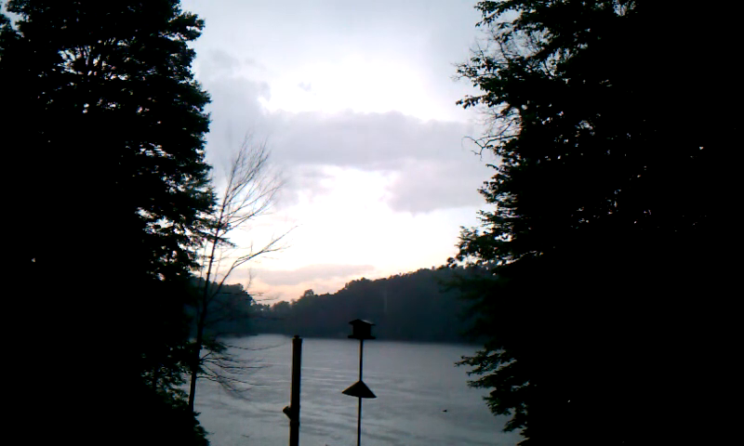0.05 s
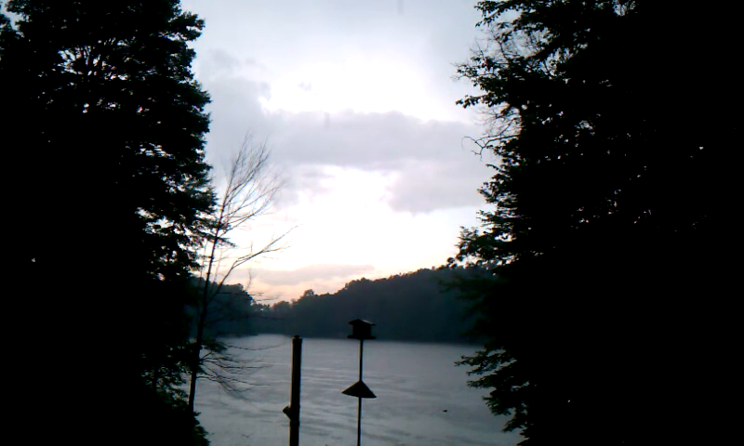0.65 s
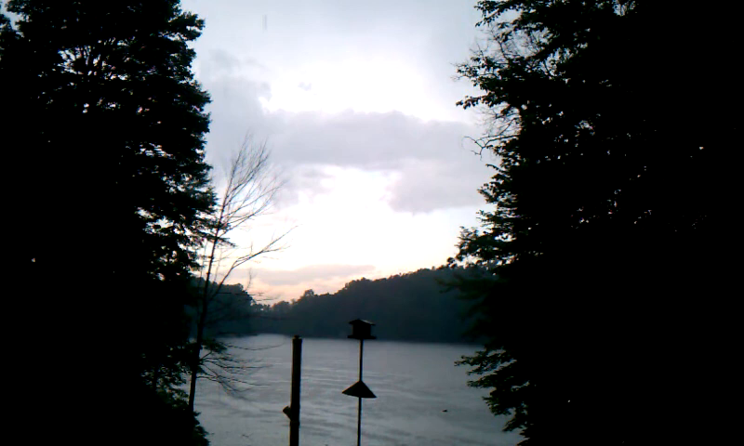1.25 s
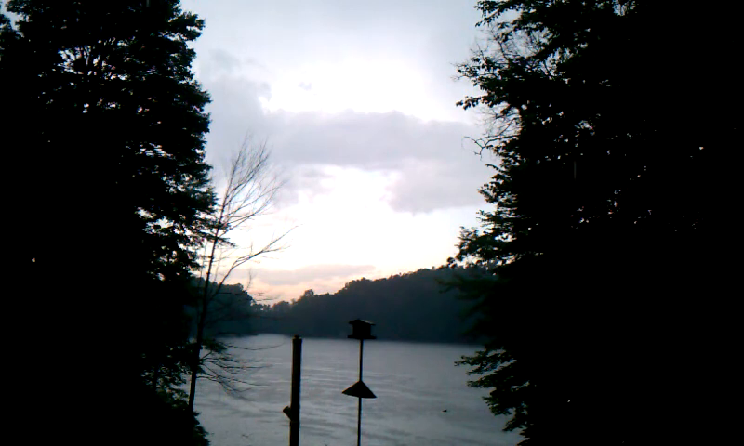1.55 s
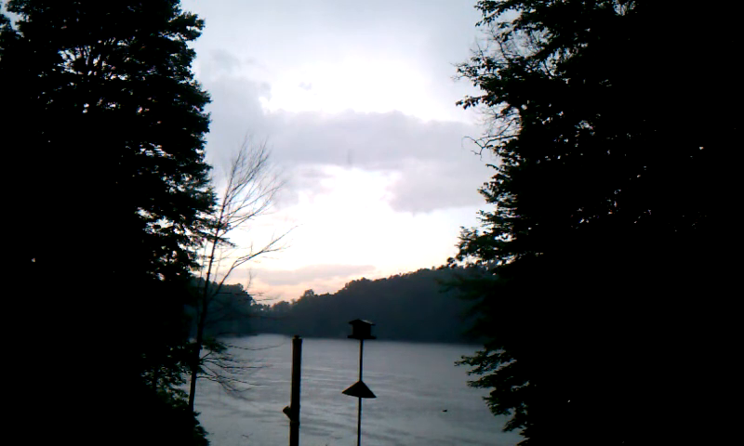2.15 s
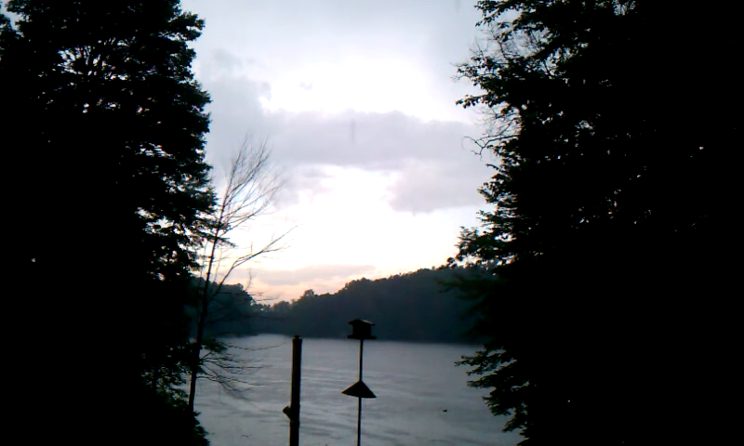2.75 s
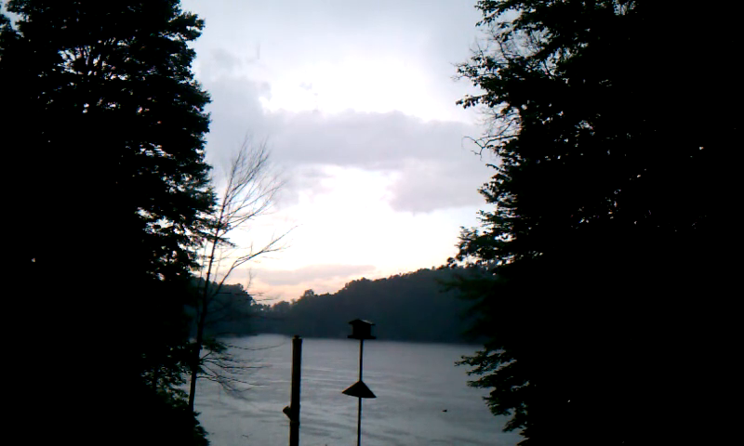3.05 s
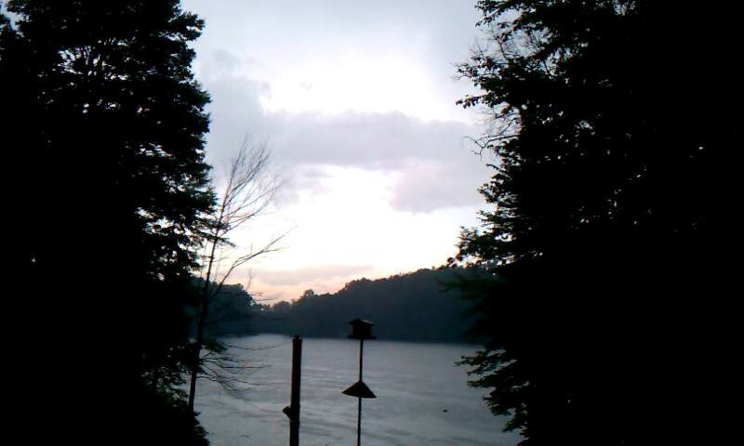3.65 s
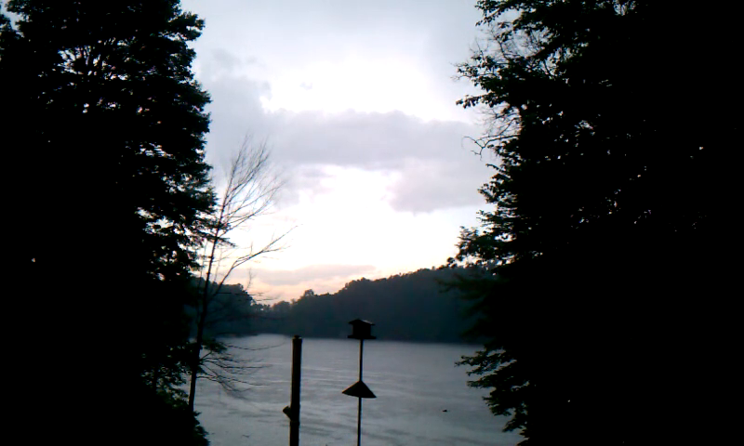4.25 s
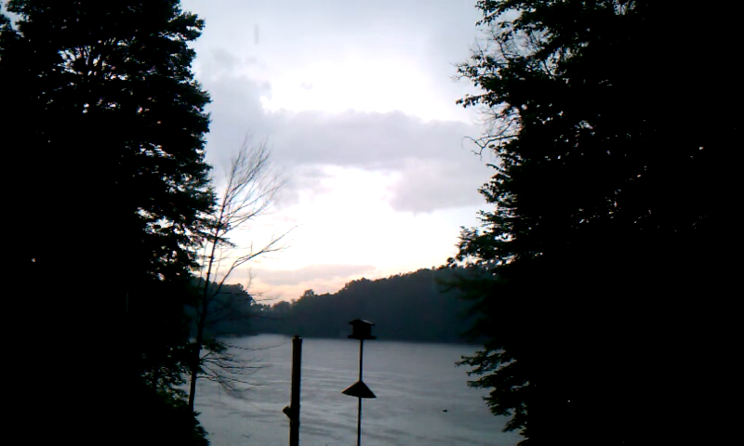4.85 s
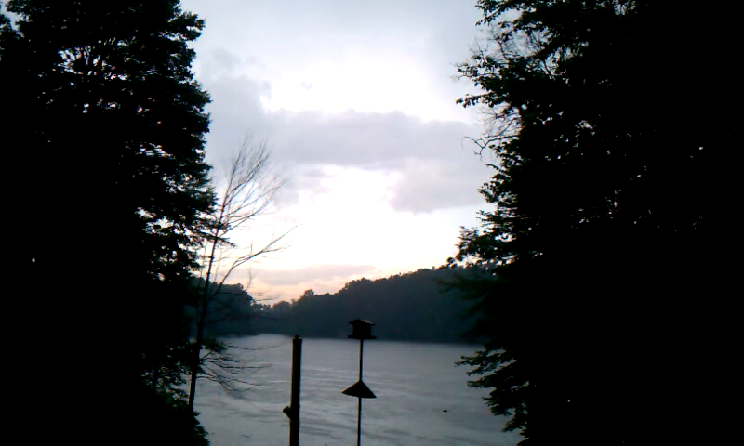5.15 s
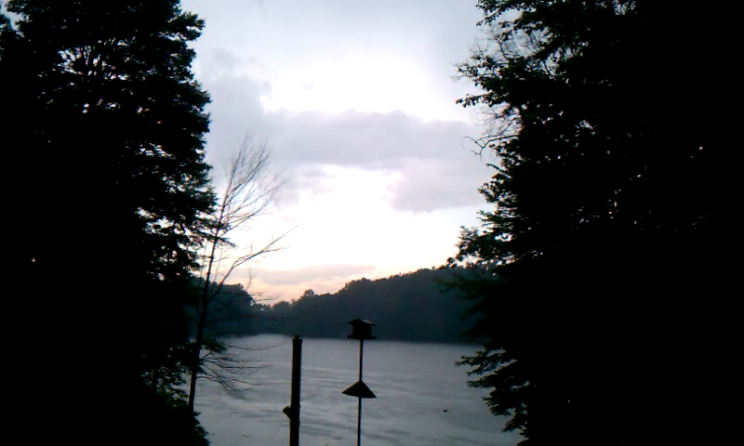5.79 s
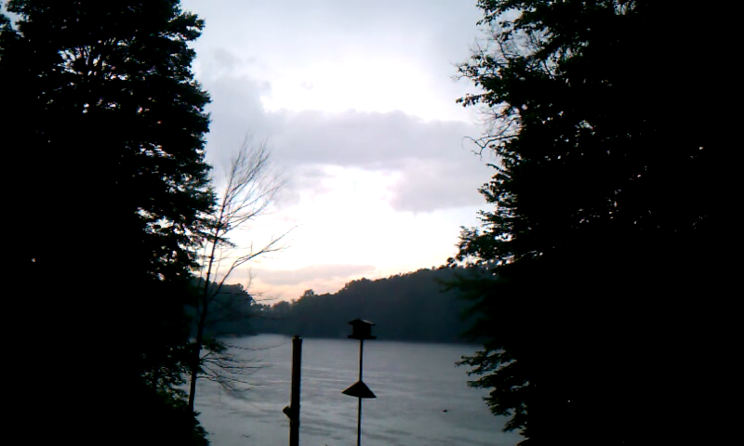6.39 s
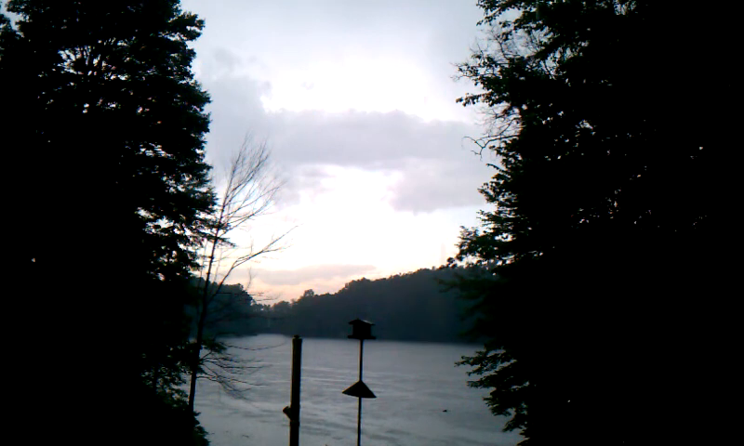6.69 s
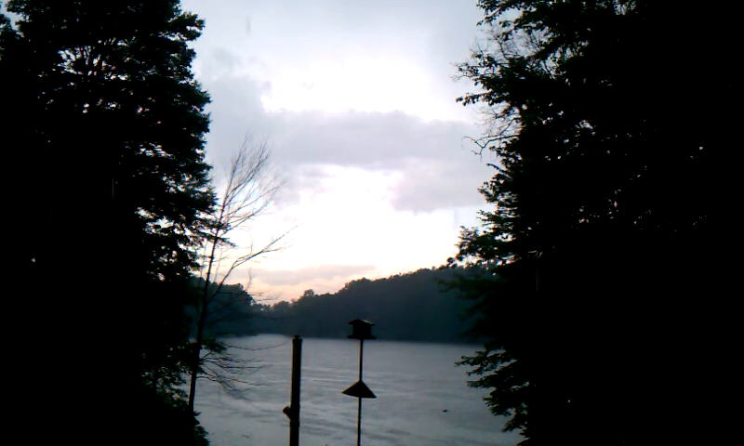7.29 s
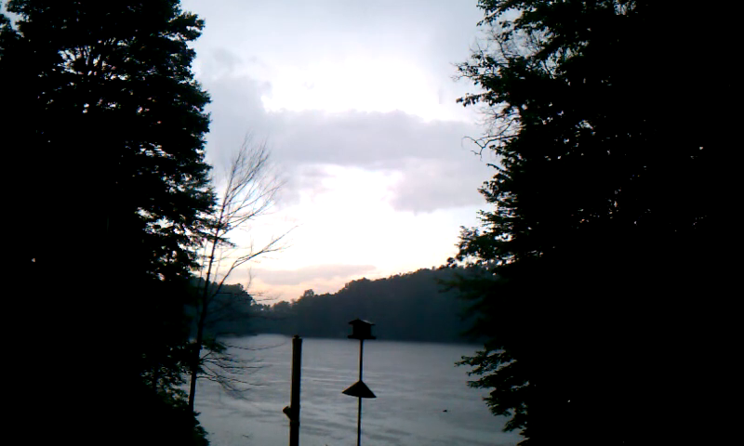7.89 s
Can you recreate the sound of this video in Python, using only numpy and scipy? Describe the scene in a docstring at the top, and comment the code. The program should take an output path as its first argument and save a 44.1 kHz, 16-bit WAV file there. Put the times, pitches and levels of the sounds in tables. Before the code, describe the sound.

Steady rain falls on a lake and the trees along its shore, making a dense, even hiss with a fine patter on leaves and ground and faint bubble plinks. Single drops tick and plop sharply near the microphone, growing more frequent and louder from about three seconds in. A light breeze rumbles underneath and swells twice. The small microphone makes it all sound dull, with little treble.

```python
"""Steady rain on a lake and its shoreline trees, heard through a small narrow-band camera microphone.
From the start, far drops merge into a hiss, nearer ones patter on leaves and ground, bubbles plink,
drips spatter and single drops tick beside the microphone, all over the rumble of a light breeze.
A small gust swells at 3.1 s, the bed dips after a close drop at 4 s, and a bigger gust peaks at 5.6 s.
At 5.9 s and 7 s the bed dips after a close drop again, swelling back each time."""
import sys
import numpy as np
from scipy import signal
from scipy.fft import rfft, irfft, next_fast_len
from scipy.io import wavfile

SR = 44100
rng = np.random.default_rng(int(sys.argv[2]) if len(sys.argv) > 2 else 0)


def transcribe(signal):
    """Save signal, clipped to [-1, 1], as a 16-bit WAV file at the path in sys.argv[1]."""
    frames = np.atleast_2d(signal).T
    limited = np.clip(frames, -1, 1)
    pcm = np.round(limited * 32767).astype(np.int16)
    wavfile.write(sys.argv[1], SR, pcm)


N = 349713
TIME = np.arange(N) / SR


def far_rain(level_db, flutter_db):
    """Countless drops on the open water merge into an even, lightly fluttering hiss."""
    # colour of the hiss: (frequency [Hz], level [dB])
    hiss_colour = [(30, -40.5), (100, -15), (280, -9.5), (550, -8), (900, -1.5), (1300, -3), (1650, -2),
                   (1980, 1.5), (2400, -1.5), (2900, -1.2), (3300, -2.5), (4500, 1), (6000, -23.5)]
    return from_db(level_db + flutter_db * drift(15)) * coloured_noise(hiss_colour)


def close_drops(level_db, thud_db, thud_ratio, echo_db, echo_s, splash_db, splash_s, splash_hz):
    """Each close drop is a sharp tick, a duller thud as it flattens, a faint echo from a nearby surface and a
    brief spray."""
    # the featured drops: (time [s], relative peak level [dB], pitch [Hz])
    hero_drops = [(0.0744, -11, 880), (1.1818, -11.5, 2030), (1.3106, -12, 1240), (1.6812, -11, 2040),
                  (2.1128, -12, 940), (2.8525, -12, 2660), (3.1057, -13, 1064), (3.1787, -2, 660),
                  (3.417, -10, 1180), (3.5748, -7, 2000), (4.0003, -11, 2780), (4.0343, -15.5, 1470),
                  (4.1035, -16, 1450), (4.166, -14.5, 2400), (4.3028, -15, 2784), (4.484, -7.5, 2780),
                  (4.586, -5.5, 850), (4.6301, -10, 2360), (5.1595, -3, 1664), (5.2584, -9, 1250),
                  (5.4898, -11.5, 2520), (5.5493, 0.2, 424), (5.8313, -6.5, 1240), (5.8782, -7.5, 2240),
                  (5.9247, -4.5, 840), (6.1575, -8, 2330), (6.3326, -16, 2680), (6.4157, -9.5, 1420),
                  (6.6427, 0.2, 2850), (6.9905, -7.5, 800), (7.0365, -19, 2640), (7.0457, -15, 2850),
                  (7.1565, -14.5, 2260), (7.1696, -12, 2540), (7.2159, -16, 2530), (7.4579, -13, 1110)]
    plop_q, ringing_hz = 0.58, 2160
    out, size = np.zeros(N), 2048
    for s, peak_db, hz in hero_drops + stray_drops(per_s=4.5, peak_db=-18.5, spread_db=0.3):
        q = plop_q * (1 + (hz / ringing_hz) ** 4)   # soft landings are dead plops, hard ones ring
        thud = impact(thud_ratio * hz, 1 / np.sqrt(2), size)
        hit = impact(hz, q, size) + from_db(thud_db) * thud
        heard = np.abs(narrow_band(hit))
        age = (np.arange(size) - heard.argmax()) / SR
        echo = from_db(echo_db) * np.interp(age - echo_s, age, hit)
        spray = rms_one(resonate(rng.standard_normal(size) ** 3, splash_hz, q=0.5))
        flight = np.maximum(age, 0) / splash_s   # the droplets land a moment after the hit
        hardness = hz / splash_hz                # soft, dull landings throw little spray
        splash = from_db(splash_db) * hardness * spray * flight * np.exp(1 - flight)
        drop = (hit + echo) / heard.max() + splash
        add(out, -from_db(peak_db + level_db) * drop, round(s * SR) - heard.argmax())
    return out


def stray_drops(per_s, peak_db, spread_db, low_hz=1090, high_hz=3280):
    """Fainter close drops fall at random: (time [s], relative peak level [dB], pitch [Hz])."""
    draws = rng.random((int(per_s * N / SR), 3))
    return [(when * N / SR, peak_db + spread_db * (2 * weight - 1), low_hz + hardness * (high_hz - low_hz))
            for when, weight, hardness in draws]


def impact(hz, q, size):
    """One hit rings a damped resonance, scaled to peak at 1 within the pass band."""
    wave = resonate(signal.unit_impulse(size, size // 16), hz, q)
    return wave / np.abs(narrow_band(wave)).max()


def patter(level_db, per_s, spread_db, size_cap, q, clump_db, surfaces=16):
    """Drops of uneven size hit leaves and ground at random; each surface answers with its own pitch."""
    # colour of the patter: (frequency [Hz], level [dB])
    patter_colour = [(250, -7), (500, -0.5), (850, -2), (1300, -1.5), (2000, -0.5), (2700, -4), (3500, 3)]
    out, shared_clumps = np.zeros(N), drift(12)
    for hz in np.geomspace(300, 3400, surfaces):
        clumps = from_db(clump_db * (shared_clumps + drift(20)))
        rate = per_s / surfaces * np.sqrt(hz / 1000) * clumps   # bright hits outnumber dull ones
        hits = rng.random(N) < rate / SR
        sizes = from_db(spread_db * np.minimum(rng.exponential(1, N), size_cap))
        polarity = rng.choice([-1, 1], N)
        taps = rms_one(resonate(hits * sizes * polarity, hz, q))
        out += from_db(at_hz(patter_colour, hz)) * np.sqrt(hz) * taps
    return from_db(level_db) * rms_one(out)


def spatters(q):
    """A fat drip from the branches breaks up into a quick cluster of small impacts."""
    # the drips: (time [s], level [dB], pitch [Hz], attack [s])
    drips = [(0.073, -26.5, 950, 0.007), (0.483, -26, 880, 0.0062), (2.77, -22, 2990, 0.005),
             (2.85, -23, 2660, 0.0022), (2.932, -28, 730, 0.0089), (3.234, -25, 990, 0.015),
             (3.577, -25.5, 2180, 0.0026), (4.492, -23, 2720, .005), (4.618, -33, 1000, 0.0064)]
    out = np.zeros(N)
    for s, level_db, hz, attack_s in drips:
        crackle = rng.standard_normal(8192) ** 3   # cubing makes the noise spiky
        age = np.arange(len(crackle)) / SR / attack_s
        swell = age * np.exp(1 - age)
        add(out, from_db(level_db) * swell * rms_one(resonate(crackle, hz, q)), (s - attack_s) * SR)
    return out


def plinks(level_db, per_s, spread_db, q, pitches=24):
    """Some drops trap a bubble in the water, which rings for a few milliseconds."""
    out = np.zeros(N)
    for hz in np.geomspace(1400, 3400, pitches) * rng.uniform(.98, 1.02, pitches):
        bubbles = rng.random(N) < per_s / pitches / SR
        strengths = from_db(spread_db * rng.uniform(-1.9, 1, N))
        out += q * resonate(bubbles * strengths, hz, q)
    return from_db(level_db) * rms_one(out)


def breeze(level_db, lumps_db, wander_db):
    """Eddies at the microphone make a low, lumpy rumble that wanders a little and swells in each gust."""
    # colour of the rumble: (frequency [Hz], level [dB])
    rumble_colour = [(15, -23), (30, -20.5), (50, -12), (80, -2.5), (130, 0.5), (190, -3.5), (300, -11.5),
                     (700, -32)]
    # gusts that swell and die away evenly: (peak time [s], rise [dB], half-length [s])
    gusts = [(3.118, 6.5, 0.092), (5.611, 11, 0.28)]
    gusts_db = sum(rise_db / (1 + ((TIME - s) / half_length) ** 2) for s, rise_db, half_length in gusts)
    envelope = from_db(level_db + gusts_db + wander_db * drift(1.5) + lumps_db * drift(20))
    return envelope * coloured_noise(rumble_colour)


def dips(fall_s, bend):
    """Gain ride for the bed: it falls within milliseconds and climbs back, quickly at first."""
    # the dips: (time [s], depth [dB], recovery [s])
    dip_cues = [(4.004, 6.5, 1), (5.929, 5, 0.7), (6.993, 8.2, 0.75)]
    gain_db = np.zeros(N)
    for s, depth_db, recovery_s in dip_cues:
        attack = np.clip((TIME - s) / fall_s, 0, 1)
        release = np.clip(1 - (TIME - s) / recovery_s, 0, 1) ** bend
        gain_db -= depth_db * attack * release
    return from_db(gain_db)


def narrow_band(x, size=1024):
    """The camera passes only the low few kilohertz."""
    # its steep treble roll-off: (frequency [Hz], gain [dB])
    roll_off = [(3000, -0.5), (3300, 1), (3500, -7), (3660, -11), (4000, -22.5), (4280, -30), (4450, -43),
                (4620, -54), (4850, -72.5), (5400, -110)]
    gains = from_db(at_hz(roll_off, np.fft.rfftfreq(size, 1 / SR)))
    taps = np.fft.fftshift(irfft(gains)) * signal.get_window("hann", size)
    return signal.fftconvolve(x, taps[1:], "same")


def resonate(x, hz, q):
    """A damped resonance applied twice: a click becomes a short pulse of about q + 1 cycles."""
    w = 2 * np.pi * min(hz, SR / 4) / SR
    damping = np.sin(w) / (2 * q)
    section = np.array([damping, 0, -damping, 1 + damping, -2 * np.cos(w), 1 - damping]) / (1 + damping)
    return signal.sosfilt([section, section], x + 1e-18)


def coloured_noise(colour):
    """Noise with the given colour, rms 1."""
    size = next_fast_len(N)
    gains = from_db(at_hz(colour, np.fft.rfftfreq(size, 1 / SR)))
    return rms_one(irfft(rfft(rng.standard_normal(size)) * gains, size)[:N])


def drift(rate_hz, hop=40, warm_up=2000):
    """Smooth random modulation, rms 1."""
    pole = np.exp(-2 * np.pi * rate_hz * hop / SR)
    noise = rng.standard_normal(N // hop + warm_up + 2)
    slow = signal.lfilter([1], [1, -2 * pole, pole * pole], noise)[warm_up:]
    return np.interp(np.arange(N) / hop, np.arange(len(slow)), rms_one(slow))


def at_hz(curve, hz):
    """An EQ curve read on a log-frequency axis."""
    freqs, levels = np.transpose(curve)
    return np.interp(np.log(hz + 1e-9), np.log(freqs), levels)


def from_db(db):
    """Decibels to gain."""
    return 10 ** (np.asarray(db) / 20)


def rms_one(x):
    """Scale to rms 1."""
    return x / np.sqrt(np.mean(x ** 2) + 1e-20)


def add(out, sound, start):
    """Mix a short sound in from a given sample on."""
    start = int(np.clip(start, 0, N - 1))
    out[start:start + len(sound)] += sound[:N - start]


def scene():
    """Far hiss, nearer patter, bubbles and breeze make the bed; close drops and spatters sit on top."""
    bed = far_rain(level_db=-28.5, flutter_db=1.05)
    bed += patter(level_db=-34.0, per_s=1100, spread_db=4.5, size_cap=3.98, q=1.66, clump_db=2.0)
    bed += plinks(level_db=-40.0, per_s=90, spread_db=5.5, q=14)
    bed += breeze(level_db=-47, lumps_db=2.5, wander_db=0.7)
    bed *= dips(fall_s=0.004, bend=1.67)
    near = close_drops(level_db=0.5, thud_db=-12.5, thud_ratio=0.39, echo_db=-18, echo_s=0.0028,
                       splash_db=-22.0, splash_s=0.0033, splash_hz=2100)
    return (bed + near + spatters(q=0.79))[None]


def record(dry):
    """The narrow band dulls everything, the hardest drops overload, and a high cut trims the very top."""
    overload, cutoff_hz = 0.77, 16500
    clipped = np.clip(narrow_band(dry[0]), -overload, overload)
    high_cut = signal.cheby2(12, 70, cutoff_hz, fs=SR, output="sos")
    return signal.sosfilt(high_cut, clipped)[None]


dry = scene()
out = record(dry)
transcribe(out)
```